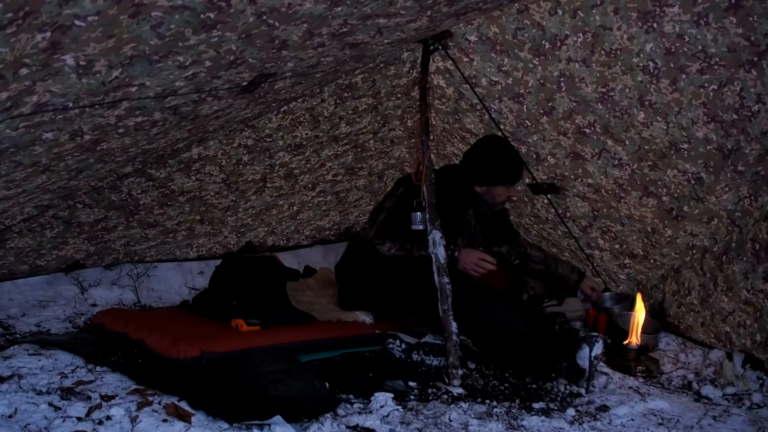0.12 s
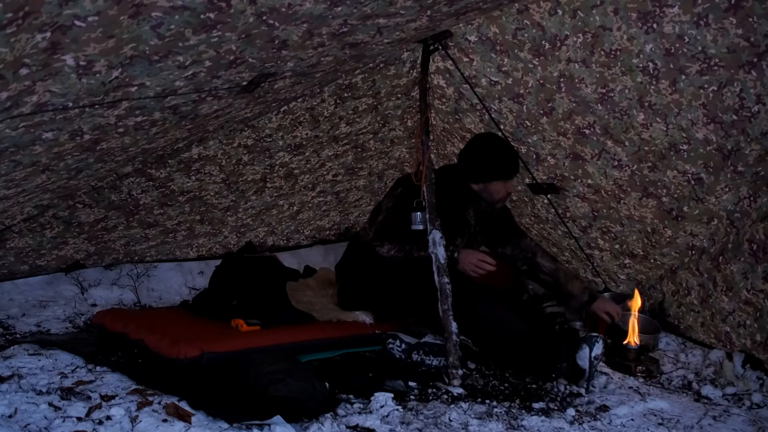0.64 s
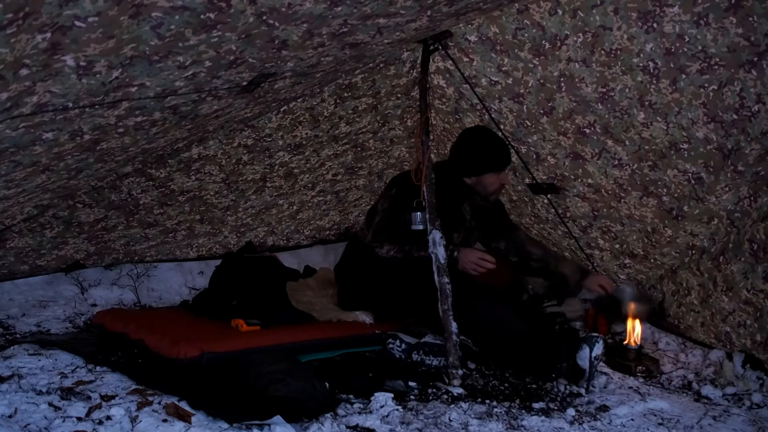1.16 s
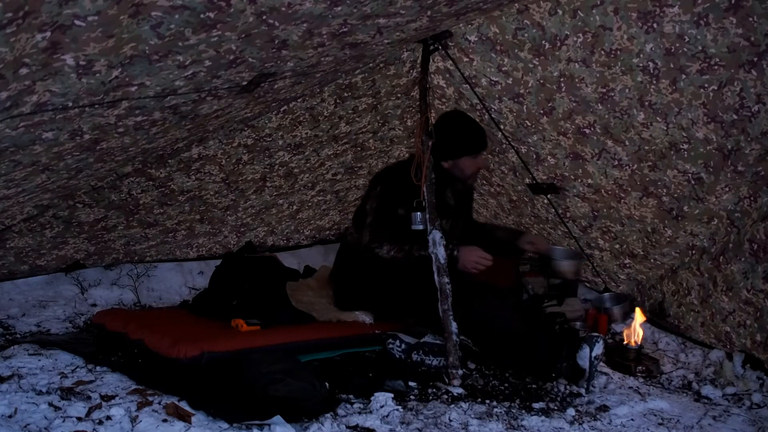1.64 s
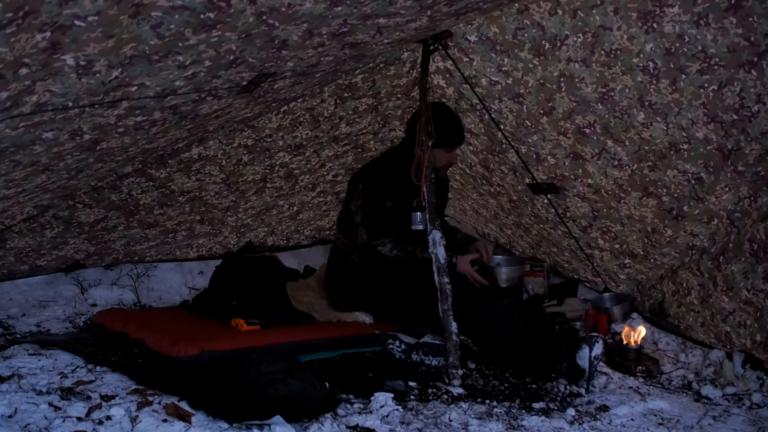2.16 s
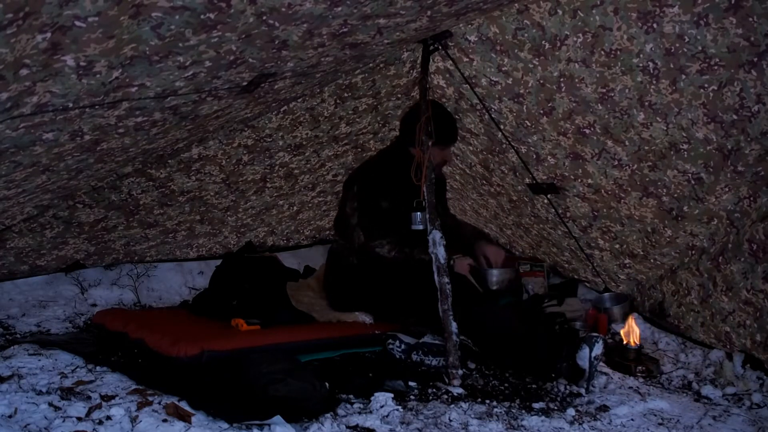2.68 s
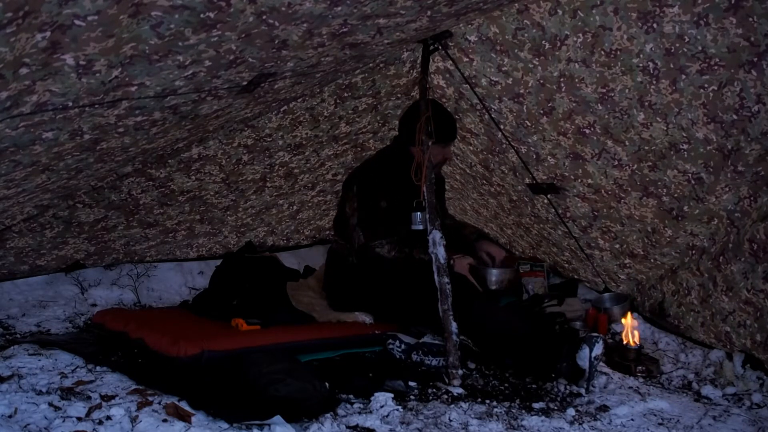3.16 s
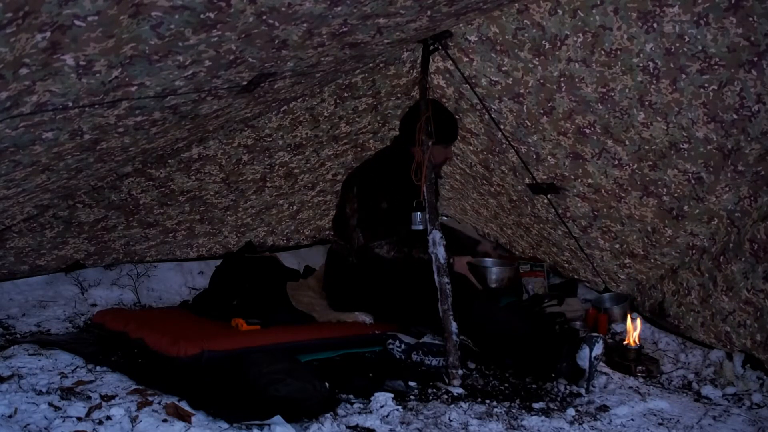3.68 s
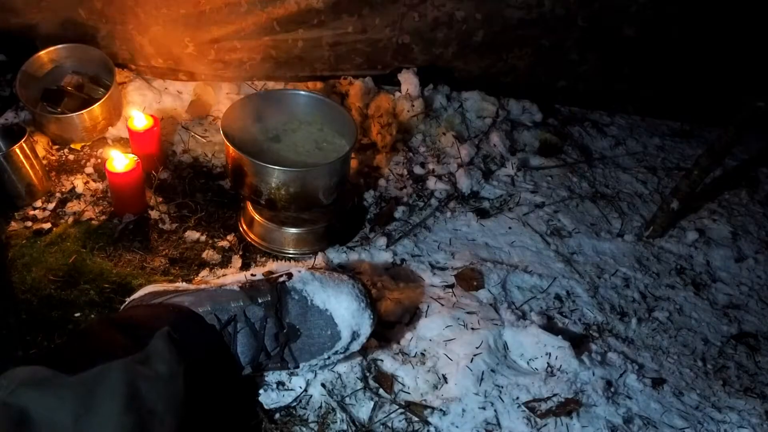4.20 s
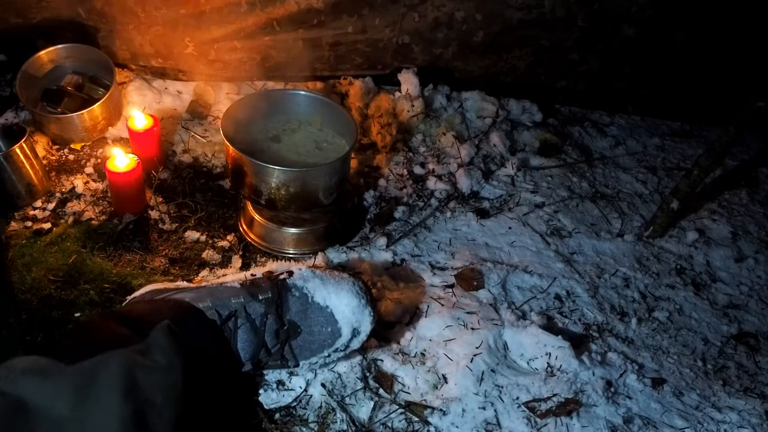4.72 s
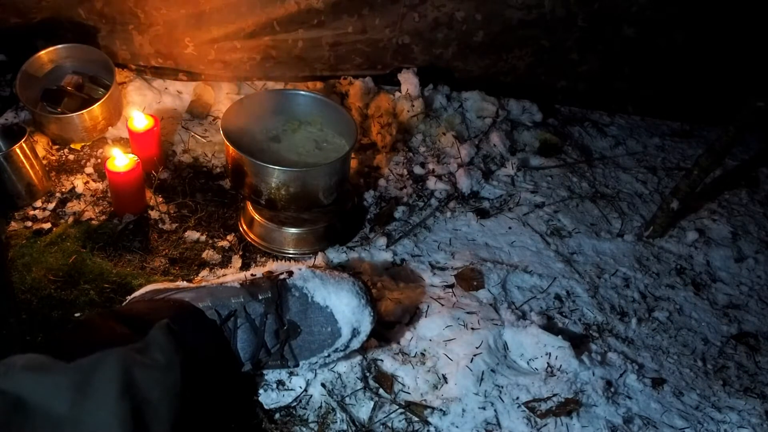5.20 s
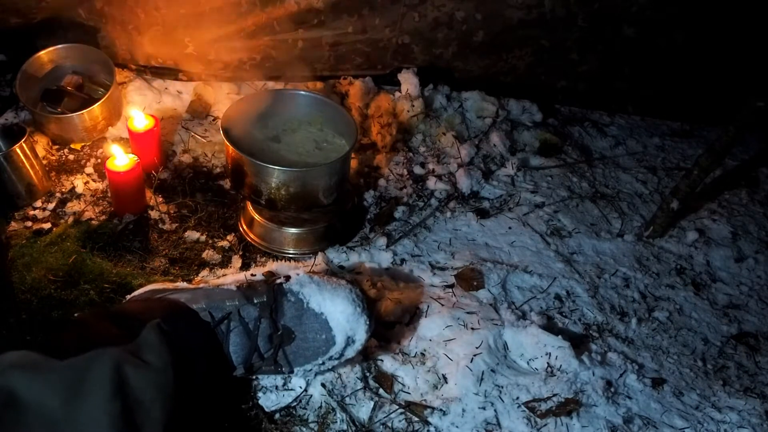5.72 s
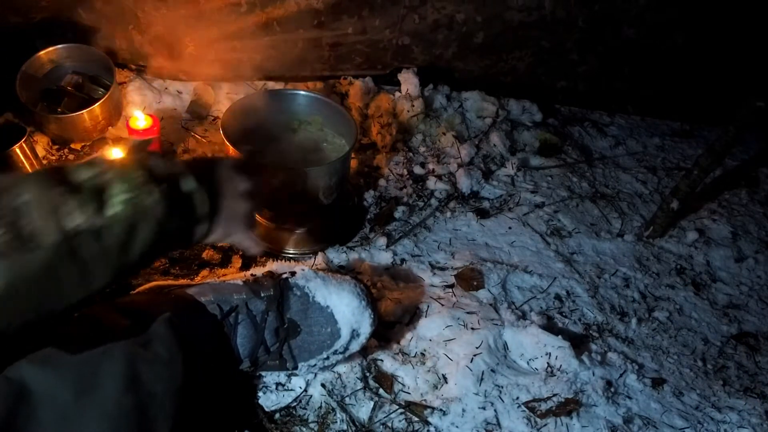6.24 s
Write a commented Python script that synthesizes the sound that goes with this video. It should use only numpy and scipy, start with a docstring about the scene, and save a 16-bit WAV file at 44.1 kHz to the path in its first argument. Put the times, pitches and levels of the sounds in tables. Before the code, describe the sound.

Outdoor winter camp, very quiet, with low soft air and burner noise. First come sparse light pot scrapes and ticks, building to a double metallic knock and a loud, bright clatter that dies quickly into a thin fading ring. Then, close to the microphone, fabric swishes and crackly icy snaps begin abruptly, with two sharp high clinks among smaller ones. Short dry tails, no echoing space.

```python
"""Metal pot and close rustling under a tarp in the snow

A burner hiss, made of steady shaped noise, lies under it all. A camper moves a thin metal pot: its scrapes
and knocks, the hardest near 2.9 s and 3.2 s, are rattling noise bursts that drive damped modes.
Close by, clothes rustle (noise that follows the movement), frozen ground snaps (short damped cycles
with an echo) and small metal parts clink (bursts driving stiffer, higher modes)."""
import sys
import numpy as np
from scipy import signal
from scipy.fft import rfft, irfft
from scipy.io import wavfile
from scipy.ndimage import uniform_filter1d

SR = 44100
rng = np.random.default_rng(int(sys.argv[2]) if len(sys.argv) > 2 else 0)


def master_out(mix):
    """Clip the mix to full scale and print it as 16-bit PCM to the path in sys.argv[1]."""
    frames = np.transpose(np.atleast_2d(mix))
    ceiling = np.clip(frames, -1, 1)
    pcm = np.round(ceiling * 32767).astype(np.int16)
    wavfile.write(sys.argv[1], SR, pcm)


def rack_gain(trim_db):
    """Turn a fader trim in dB into the linear factor to multiply a signal by."""
    fader = np.asarray(trim_db, float)
    return 10 ** (fader / 20)


N = 280476

# strength of the cloth rubbing over time: t/s, fibre swish level/dB, fabric body level/dB
RUBBING = [(1.3, -65, -70), (1.55, -61.5, -67), (1.75, -52.5, -67), (2.0, -58.5, -67), (2.6, -65.5, -71),
           (4.0, -77, -64), (4.06, -50.5, -71), (4.13, -44, -50.5), (4.2, -49, -56), (4.27, -46, -51.5),
           (4.35, -51, -52.5), (4.44, -41.5, -53.5), (4.62, -42, -49), (4.78, -47.5, -54),
           (4.93, -44.5, -51), (5.02, -52, -55.5), (5.15, -48.5, -52.5), (5.38, -48.5, -53),
           (5.6, -45, -51), (5.72, -44.5, -47.5), (6.0, -42, -48.5), (6.24, -42, -48), (6.36, -46.5, -50.5)]
NEAR_LEAD_MS = 0.12  # left port leads for all that lies close by


def evened(x):
    """Normalization to unit root-mean-square."""
    return x / np.sqrt(np.mean(np.abs(x) ** 2) + 1e-20)


def read(points, hz):
    """Interpolation of a spectrum table on a logarithmic frequency axis."""
    f, value = np.transpose(points)
    return np.interp(np.log(hz + 1), np.log(f + 1), value)


def bumps_db(table, hz):
    """Superposition in dB of bell-shaped peaks or dips, each width spanning the 1/e points."""
    return sum(db * np.exp(-(2 * (hz - centre_hz) / width) ** 2) for centre_hz, width, db in table)


def add(mix, s, sound):
    """Linear superposition of a sound on the mix from time s."""
    part = mix[..., round(s * SR):][..., :sound.shape[-1]]
    part += sound[..., :part.shape[-1]]


def ports(hz, lead_ms, pan_db):
    """Interaural-like cues of two spaced microphone ports: a time lead, and a shadow felt by the treble."""
    phase = np.exp(1j * np.pi * hz * lead_ms / 1000)
    left = phase * rack_gain(pan_db / 2 * hz / (hz + 2000))
    return np.array([left, 1 / left])


def noise(magnitude, likeness, lead_ms, pan_db, size, patchy_db, flicker_db):
    """Partly coherent random short-time spectra at two ports, with drifting patches and wide-band flicker."""
    frames, hz = 4 * N // size + 5, np.fft.rfftfreq(size, 1 / SR)
    a, b, c, d, patches = rng.standard_normal((frames, len(hz), 5)).T
    patches = uniform_filter1d(uniform_filter1d(patches, size=12, axis=0), size=12, axis=1)
    flicker = evened(uniform_filter1d(rng.standard_normal(frames), size=3))

    same = np.clip(read(likeness, hz), -1, 1)[:, None]
    left, other = a + 1j * b, c + 1j * d
    right = same * left + np.sqrt(1 - same ** 2) * other
    spectra = np.array([left, right]) * ports(hz, lead_ms, pan_db)[..., None]

    field = magnitude(hz[:, None], np.arange(frames) * size / 4 / SR)
    spectra *= field * rack_gain(patchy_db * evened(patches) + flicker_db * flicker)
    sound = signal.istft(spectra, nperseg=size, noverlap=3 * size // 4)[1][:, :N]
    return np.sqrt(np.mean(field ** 2)) * evened(sound)


def placed(x, lead_ms, pan_db, wet_db, t60):
    """Direct sound plus scattering: tarp and ground add a short tail, unalike at the ports, mostly treble."""
    t = np.arange(SR // 4) / SR
    tail = rng.standard_normal((2, len(t))) * rack_gain(-60 * t / t60) * (t > .001)
    tail = signal.lfilter([1, -.8], 1, tail)
    hz = np.fft.rfftfreq(N, 1 / SR)
    direct = ports(hz, lead_ms, pan_db)
    scattered = rack_gain(wet_db) * abs(direct) * rfft(tail / np.linalg.norm(tail[0]), N)
    return irfft(rfft(x) * (direct + scattered), N)


def struck(events, modes, clatter, clatter_db, spot_db, lowest_hz, blow):
    """Modal excitation: rattling contacts drive the modes, most of all those near the spot's own frequency."""
    out, t = np.zeros((2, N)), np.arange(8192) / SR
    mode_hz, width, mode_db = np.transpose(modes)[:, :, None]
    width = np.maximum(width, 22)  # damping never falls below this
    hz = np.fft.rfftfreq(len(t), 1 / SR)
    for s, level_db, rise, rattle, tilt, spot_hz in events:
        def colour_db(f):
            """Spectral weighting by a tilt per octave about 3 kHz and a peak at the spot's frequency."""
            near_spot = np.exp(-(np.log((f + 1) / spot_hz) / 0.076) ** 2)
            return tilt * np.log2((f + 1) / 3000) + spot_db * near_spot

        drive, shared, *own, grain = rng.standard_normal((5, len(t)))
        onset = np.minimum(t / max(rise, 1e-4), 1) ** 2
        shape = onset * rack_gain(-60 * np.maximum(t - rise, 0) / max(rattle, 1e-3))
        shape = shape * rack_gain(3.8 * evened(uniform_filter1d(grain, size=70)))  # the contact chatters

        db = mode_db + colour_db(mode_hz) + 2 * rng.standard_normal(mode_hz.shape)
        decay = np.exp(-np.pi * width * t)
        ring = (rack_gain(db) * width * decay * np.sin(2 * np.pi * mode_hz * t)).sum(0)
        force = shape * drive
        force[int(rise * SR)] += blow * np.linalg.norm(force)  # one clean blow starts the modes together
        ringing = signal.fftconvolve(force, ring / np.linalg.norm(ring))[:len(t)]

        # in the treble each port sees other patches of the wall
        dense = shared + 0.69 * signal.lfilter([1, -.9], 1, own)
        dense = irfft(rfft(dense) * rack_gain(read(clatter, hz) + colour_db(hz)), len(t))
        sound = ringing + rack_gain(clatter_db) * shape * evened(dense)

        # event levels lie 8 dB above the loudest 4.5 ms rms
        loudest = np.sqrt(uniform_filter1d((sound ** 2).mean(0), size=200).max())
        add(out, max(s - rise / 2, 0), rack_gain(level_db - 8.0) * sound / loudest)
    # a steep high-pass at lowest_hz keeps the knocks, scrapes and clinks thin, without bass
    return signal.sosfilt(signal.butter(8, lowest_hz, "high", fs=SR, output="sos"), out)


def hiss():
    """Stationary noise filtered by resonances: burner hiss and low air noise, coloured by the shelter."""
    # spectrum of burner and air: f/Hz, relative level/dB
    hiss_spectrum = [(15, -45), (25, -10.5), (102, -1.5), (133, -4.5), (165, -2.5), (234, -5.5), (333, -12),
                     (540, -5.5), (926, -14), (1430, -18.5), (1550, -17.5), (5340, -18.5), (15700, -30.5)]
    # air resonances of the shelter: f/Hz, width/Hz, gain/dB
    shelter = [(565, 84, 3), (1088, 230, 7), (1394, 170, 7.5)]
    # coherence of the ports: f/Hz, left-right likeness
    hiss_likeness = [(60, 0.49), (500, 0.68), (1500, 0.38), (3000, 0.027), (8000, 0.042)]
    level_db = -51.5  # rms

    def magnitude(hz, t):
        """Time-invariant spectrum of source times resonances."""
        return rack_gain(level_db) * evened(rack_gain(read(hiss_spectrum, hz) + bumps_db(shelter, hz)))

    return noise(magnitude, hiss_likeness, lead_ms=-0.091, pan_db=-3, size=2048, patchy_db=0.96, flicker_db=0.06)


def cloth(hz, t):
    """Friction spectrum: fine swish of fibres, brighter when rubbed harder, over the duller fabric body."""
    # fibre swish: f/Hz, relative level/dB
    swish_spectrum = [(880, -46), (1500, -8.5), (2150, -5.5), (5810, -3), (9220, -6.5), (10300, -7.5),
                      (13000, -6.5), (15800, -17), (16500, -52)]
    # fabric body: f/Hz, relative level/dB
    body_spectrum = [(47, -43), (80, -14), (129, -4.5), (162, 5.5), (246, -1.5), (314, -3), (505, 0),
                     (779, -0.5), (1010, 4), (1230, 0), (2500, -14), (3250, -27), (5500, -120)]
    usual_db, usual_tilt, tilt_per_db = -43.5, -0.9, 0.27  # tilts in dB per octave
    s, swish_db, body_db = np.transpose(RUBBING)
    level_db = np.interp(t, s, swish_db)
    tilt = np.clip(usual_tilt + tilt_per_db * (level_db - usual_db), -3, 3)
    swish = evened(rack_gain(read(swish_spectrum, hz))) * rack_gain(level_db + tilt * np.log2((hz + 1) / 5000))
    body = evened(rack_gain(read(body_spectrum, hz))) * rack_gain(np.interp(t, s, body_db))
    return np.hypot(swish, body)


def rustle():
    """Frictional noise of rubbing cloth, amplitude-modulated by the movement."""
    # coherence of the ports: f/Hz, left-right likeness
    rustle_likeness = [(100, 0.64), (1000, 1), (3000, 0.1), (6000, 0.052), (10000, 0.11)]
    return noise(cloth, rustle_likeness, NEAR_LEAD_MS, pan_db=3.5, size=512, patchy_db=1.5, flicker_db=1.12)


def pot():
    """Damped modal vibration of a hand-held pot: knocks ring, scrapes mostly clatter, one mode hums on."""
    # knocks: t/s, level/dB, rattle t60/s, tilt/(dB per octave), f/Hz most excited at that spot
    knock_table = [(.7565, -24.5, 0.021, 5, 4800), (1.9145, -32.5, 0.013, 2.5, 5000),
                   (2.057, -34.5, .05, -2, 1800), (2.337, -37, 0.043, -4, 2070),
                   (2.818, -34, 0.023, 1, 4410), (2.909, -22, 0.16, -7, 3250),
                   (2.917, -11, 0.059, -2.5, 685), (2.93, -22, 0.16, -5, 3230),
                   (2.971, -32, 0.14, 0.5, 6300), (3.067, -27, 0.075, 4.5, 4700),
                   (3.069, -31.5, .043, -6, 684), (3.1655, -18, .15, -2, 654), (3.17, -16, .07, 0, 680),
                   (3.174, -11.5, .11, .8, 4650), (3.2, -12.5, 0.081, -2.5, 5200),
                   (3.226, -3.5, .036, 1.5, 1600), (3.231, -8, 0.028, 2, 4340),
                   (3.244, -10.5, .084, -0.5, 626), (3.262, -22, .14, -3.3, 2660)]
    # pot sliding in a glove or on its stand: t/s, level/dB, rattle t60/s, f/Hz most excited
    scrape_table = [(0.0262, -34.5, 0.1, 5200), (.0423, -31.5, 0.027, 4900), (0.485, -45, 0.22, 8300),
                    (.5844, -48, .09, 9090), (0.6156, -37, 0.2, 1990), (0.8036, -41.5, .09, 5730),
                    (2.0344, -41, .09, 9000), (2.1502, -47.5, .09, 5430), (2.284, -43.5, 0.49, 4670),
                    (2.7677, -40.5, 0.083, 4930), (3.098, -36, 0.11, 2730)]
    # hand-damped modes: f/Hz, width/Hz before the floor in struck(), level/dB
    pot_modes = [(680.3, 30, 0.5), (910, 25, -15), (1075, 22, -14), (1419, 40, -1), (1980, 51, -1),
                 (2660, 15, 0.5), (2860, 23, -5), (3395, 72, 0.5), (3560, 30, 0), (3724, 53, -1),
                 (4090, 12, -3.5), (4386, 41, 2.5), (4690, 22, -5), (4900, 40, 1), (5180, 110, -3.5),
                 (5930, 54, -1.5), (6860, 21, -9), (7000, 140, -14), (7620, 120, -28), (7700, 44, -21),
                 (8340, 56, -24), (8530, 52, -6), (9200, 33, -23), (9100, 40, -25), (9400, 55, -9)]
    # dense unresolved modes: f/Hz, relative level/dB
    pot_clatter = [(180, -85), (300, -98), (678, -8.5), (801, -18), (1460, -9), (2440, -6), (5800, -1.5),
                   (6620, -5), (8500, -3.5), (13000, -12), (16000, -27)]

    # a looser, longer rattle also starts more softly: rise in s
    knocks = [(s, db, .0012 + .021 * rattle, rattle, tilt, hz) for s, db, rattle, tilt, hz in knock_table]
    scrape_rise_s, scrape_tilt = .018, 0  # tilt in dB per octave
    scrapes = [(s, db, scrape_rise_s, rattle, scrape_tilt, hz) for s, db, rattle, hz in scrape_table]
    dry = struck(knocks, pot_modes, pot_clatter, clatter_db=2.9, spot_db=8.5, lowest_hz=570, blow=0.8)
    dry += struck(scrapes, pot_modes, pot_clatter, clatter_db=4.5, spot_db=9, lowest_hz=930, blow=.05)

    # this mode rings only once the hand loosens
    let_go_s, hum_hz, hum_width_hz, hum_db = 3.294, 3283, 7.5, -38
    t = np.arange(SR // 2) / SR
    envelope = np.minimum(t / .01, 1) * np.exp(-np.pi * hum_width_hz * t)
    add(dry, let_go_s, rack_gain(hum_db) * envelope * np.sin(2 * np.pi * hum_hz * t))
    return placed(dry, lead_ms=-0.03, pan_db=-4.5, wet_db=-5.0, t60=0.016)


def snaps():
    """Impulsive fracture: a one-cycle tick over a low thump, a ground echo and a scattered tail."""
    # the clearest dry snaps: t/s, level/dB, thump relative level/dB
    snap_table = [(4.138, -33.5, -23), (4.1776, -34, -16), (4.2467, -34, -18), (4.2944, -43, 8),
                  (4.3374, -36, -12), (4.83, -27.5, -37), (4.8414, -34.5, -4), (4.909, -40, -19),
                  (4.9189, -24.5, -22), (4.982, -32.5, -2), (5.0043, -36, -17), (5.0405, -30.5, -17),
                  (5.1522, -33, -23), (5.4694, -27, -12), (5.507, -27.5, -29), (5.674, -23.5, -24),
                  (6.228, -30.5, -10)]
    out, t = np.zeros((2, N)), np.arange(1500) / SR
    tick = np.exp(-5440 * t / 0.64) * np.sin(2 * np.pi * 5440 * t)
    thump = np.exp(-1180 * t / 1.7) * np.sin(2 * np.pi * 1180 * t)
    lead, echo = int(NEAR_LEAD_MS * SR / 1000), int(.002 * SR)

    # small snaps fall at random times, 30 per second; their level follows the cloth
    s, swish_db, _ = np.transpose(RUBBING)
    when, size, low = rng.random((int(30 * (s[-1] - s[0])), 3)).T
    when = s[0] + when * (s[-1] - s[0])
    small_db = np.interp(when, s, swish_db) + 4 - 2.7 * np.log(size + .1)
    small = np.transpose([when, small_db, 16 * low - 22])

    for s, level_db, thump_db in [*snap_table, *small]:
        click = -3.2 * tick - 0.89 * rack_gain(thump_db) * thump
        click = click + rng.uniform(0.16, 0.94) * np.roll(click, echo)
        tail = rng.standard_normal((2, len(t))) * rack_gain(-18.0 - 60 * t / 0.022)
        pair = np.array([click, np.roll(click, lead)])
        sound = pair + signal.fftconvolve(click[None], tail, axes=1)[:, :len(t)]
        add(out, s, rack_gain(level_db) * sound)
    return out


def parts():
    """Modal vibration of small stiff metal parts, all struck alike: nothing rings low."""
    # clinks: t/s, level/dB, f/Hz most excited
    clink_table = [(5.1162, -30, 5300), (5.1233, -33, 5260), (5.2104, -20, 9100), (5.2825, -33, 6880),
                   (5.341, -23.5, 3590), (5.3991, -8, 3450), (5.425, -13, 6500), (5.452, -21.5, 4240),
                   (5.4894, -36, 4580), (5.5248, -23.5, 12200), (5.7638, -20.5, 5000),
                   (5.7698, -10.5, 3180), (5.8193, -24, 3240), (5.8657, -21, 10800), (5.8707, -35, 2560)]
    # modes: f/Hz, width/Hz, level/dB
    part_modes = [(2560, 90, -1), (3194, 49, 7.5), (3645, 68, 8), (4240, 79, -18), (4900, 84, -5),
                  (5610, 130, -6), (6880, 83, 3), (7460, 100, -15), (8270, 140, -9), (9080, 166, -4),
                  (11500, 74, -21), (12200, 110, -9), (13000, 130, -19), (14800, 83, -18)]
    # dense unresolved modes: f/Hz, relative level/dB
    part_clatter = [(1060, -51), (1800, -30), (2670, -19), (3200, 2), (5640, -1.5), (6180, -5.5),
                    (9250, -6.5), (10700, -15.5), (11900, -6.5), (16000, -22)]
    rise_s, rattle_s, tilt = .003, 0.025, 0.2  # rattle as t60; tilt in dB per octave
    clinks = [(s, db, rise_s, rattle_s, tilt, hz) for s, db, hz in clink_table]
    dry = struck(clinks, part_modes, part_clatter, clatter_db=3.0, spot_db=10.0, lowest_hz=2790, blow=0.81)
    return placed(dry, NEAR_LEAD_MS, pan_db=6, wet_db=3.0, t60=0.021)


def scene():
    """Linear superposition of all sources."""
    return hiss() + rustle() + pot() + snaps() + parts()


def low_pass(x):
    """Removes everything above the highest recorded frequency."""
    return signal.sosfilt(signal.butter(12, 16640, fs=SR, output="sos"), x)


def record(dry):
    """Linear filtering: two notches of the microphone housing and a steep band edge colour everything."""
    # shadows of the microphone housing: f/Hz, width/Hz, gain/dB
    housing_notches = [(6576, 790, -9), (10420, 1070, -9)]
    hz = np.fft.rfftfreq(N, 1 / SR)
    edge_db = -32 * np.clip((hz - 15850) / 150 + 1, 0, 1)  # falls over the 150 Hz below 15850 Hz
    mix = irfft(rfft(dry) * rack_gain(bumps_db(housing_notches, hz) + edge_db), N)
    return low_pass(mix)


dry = scene()
out = record(dry)
master_out(out)
```